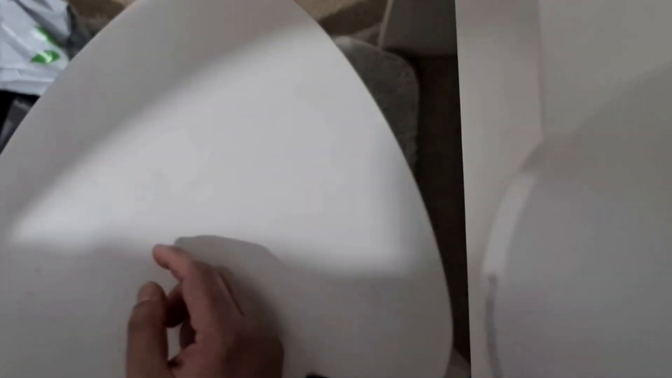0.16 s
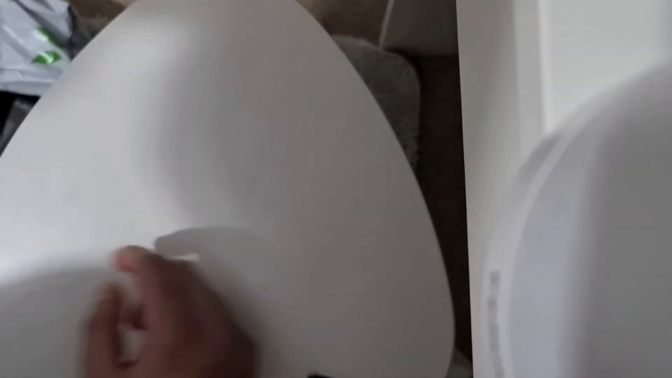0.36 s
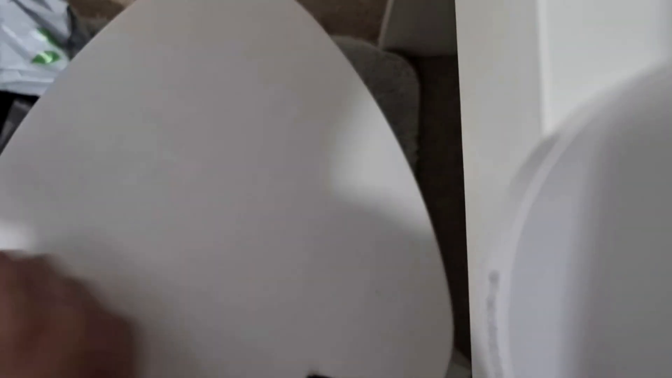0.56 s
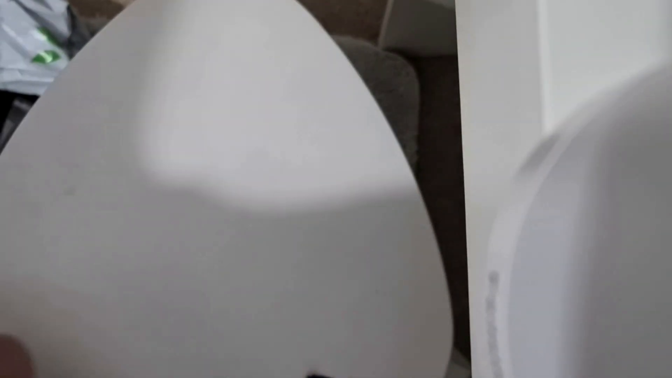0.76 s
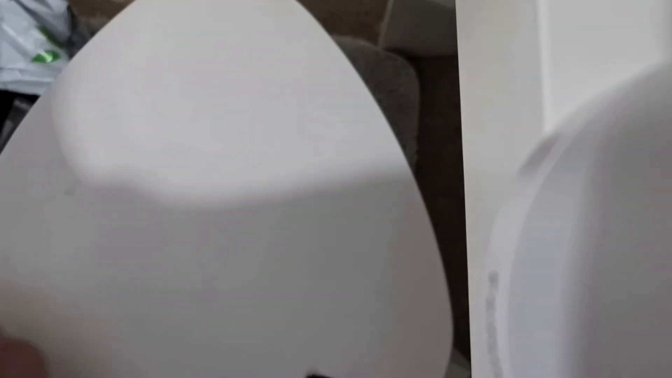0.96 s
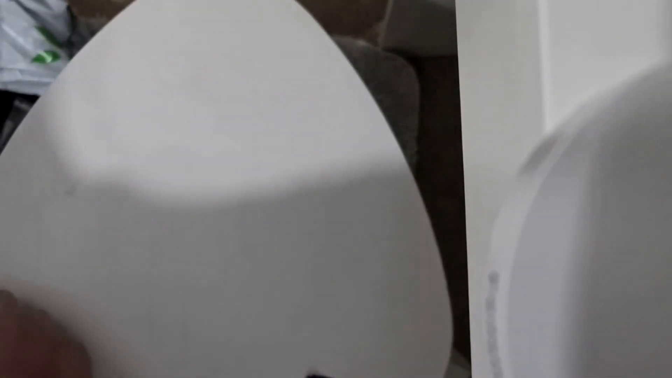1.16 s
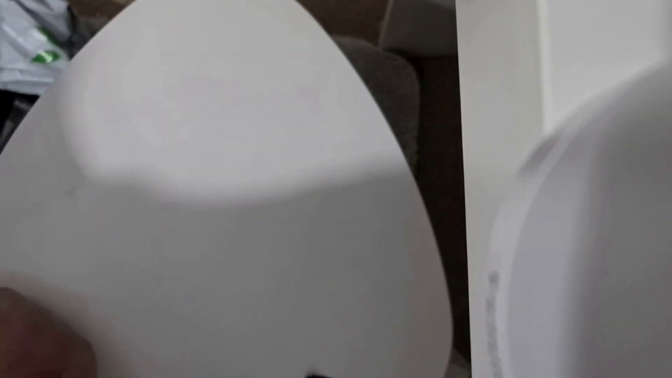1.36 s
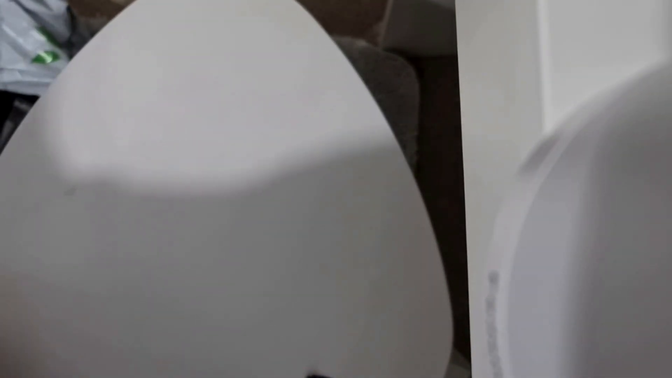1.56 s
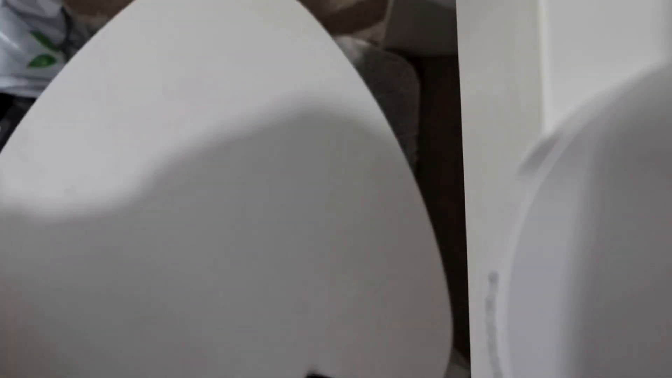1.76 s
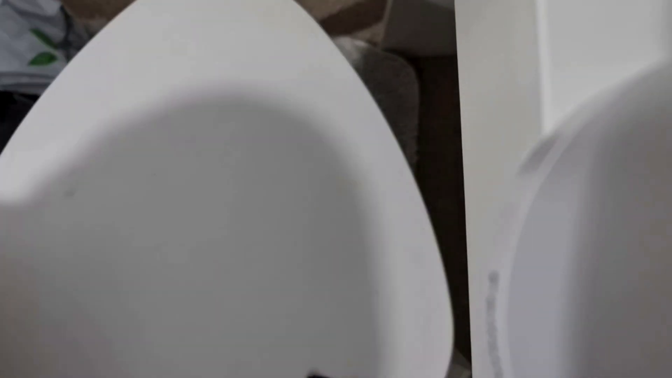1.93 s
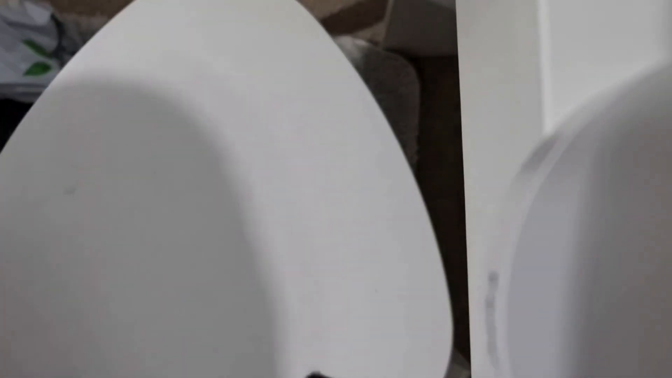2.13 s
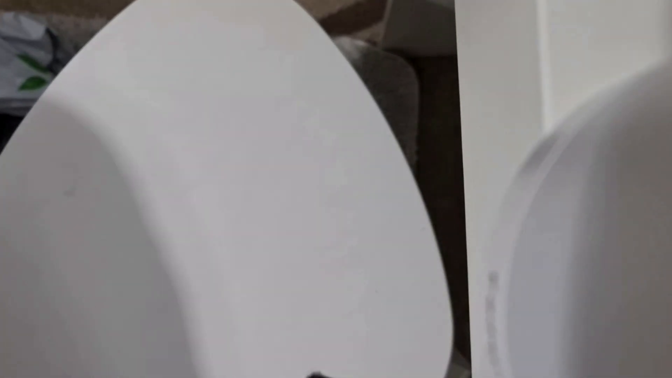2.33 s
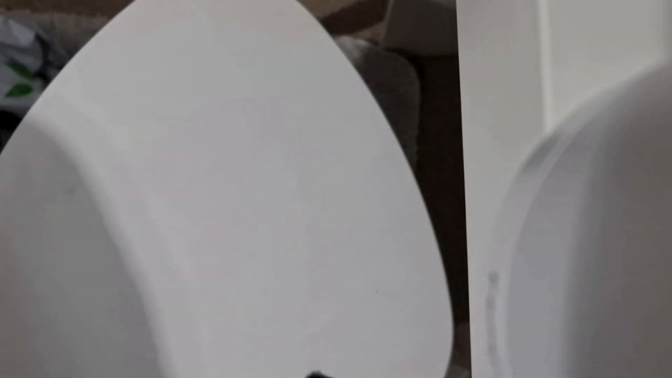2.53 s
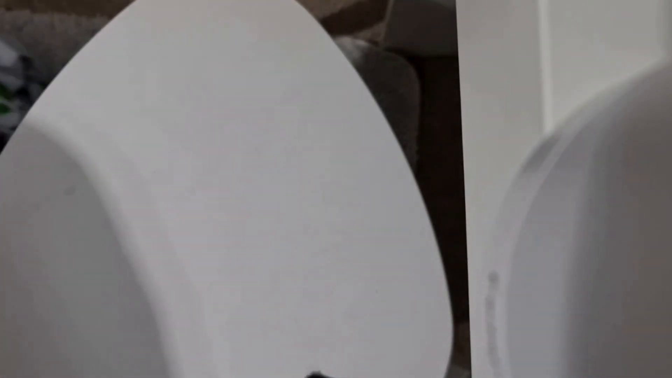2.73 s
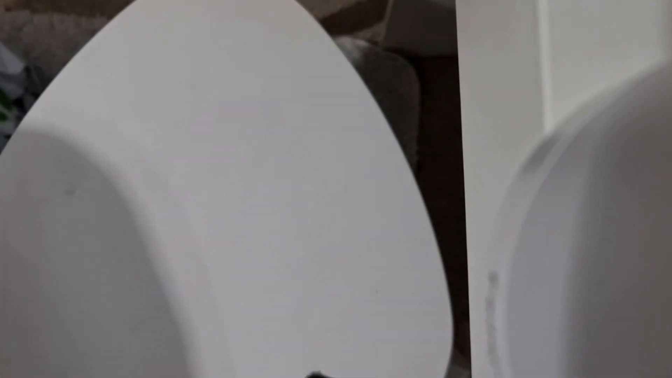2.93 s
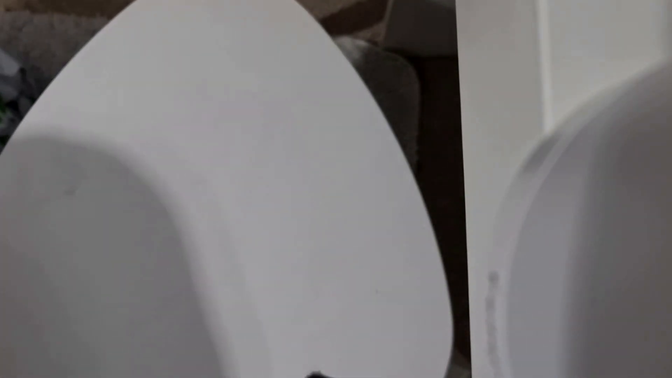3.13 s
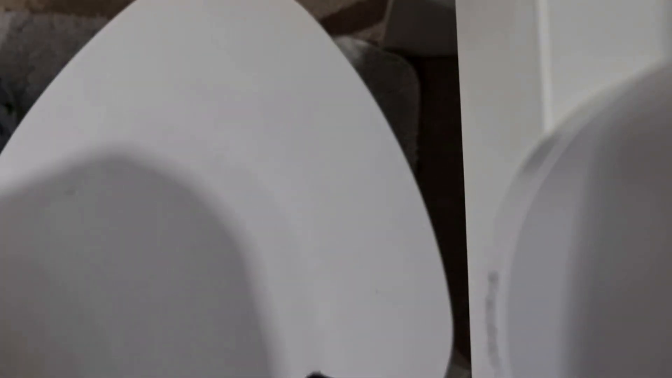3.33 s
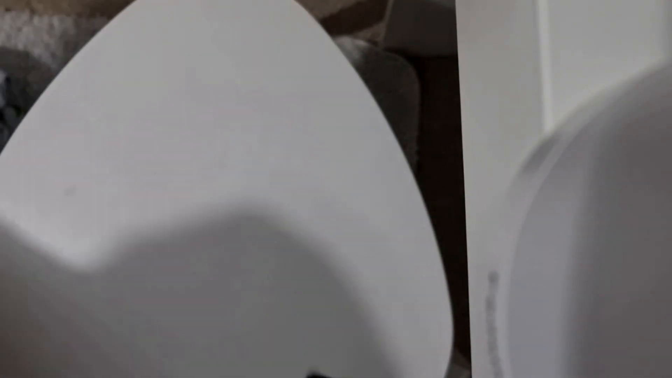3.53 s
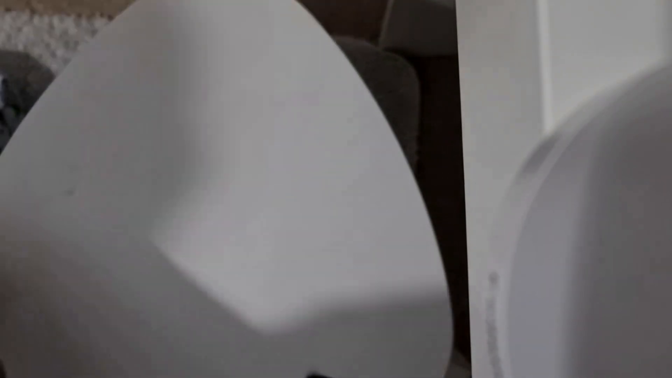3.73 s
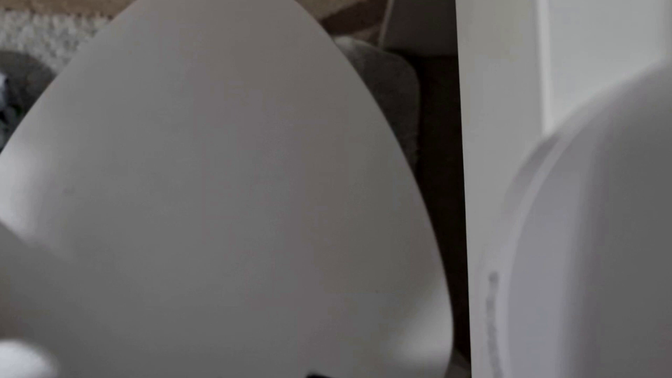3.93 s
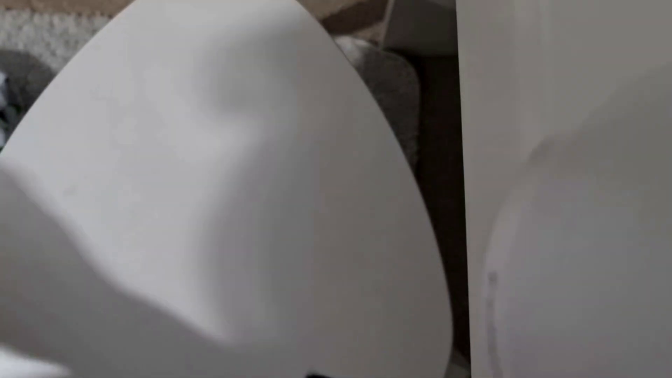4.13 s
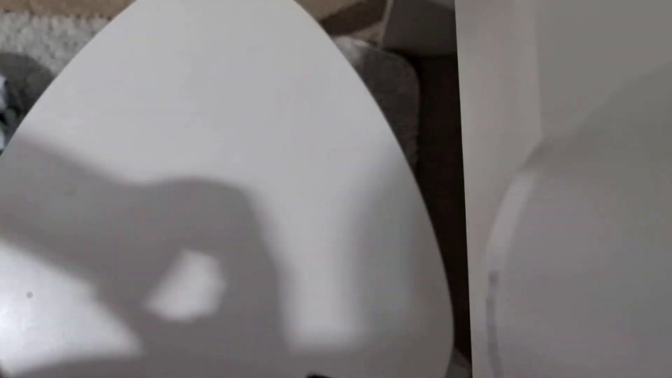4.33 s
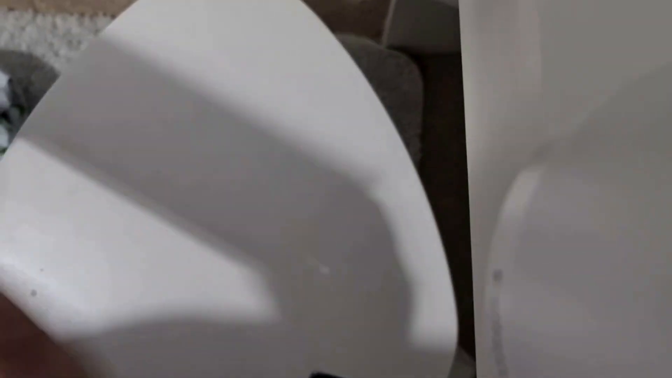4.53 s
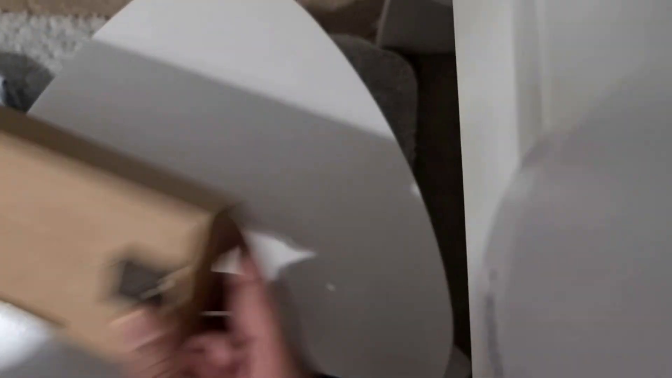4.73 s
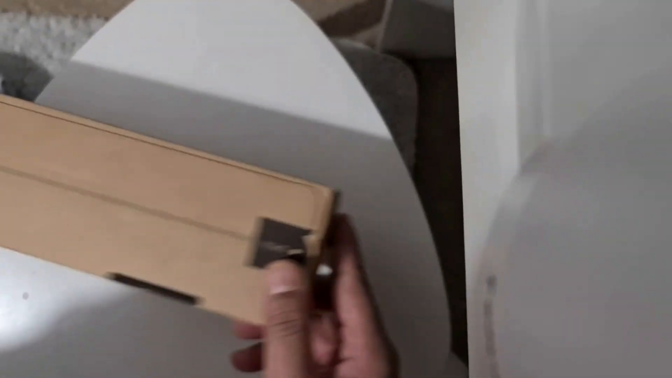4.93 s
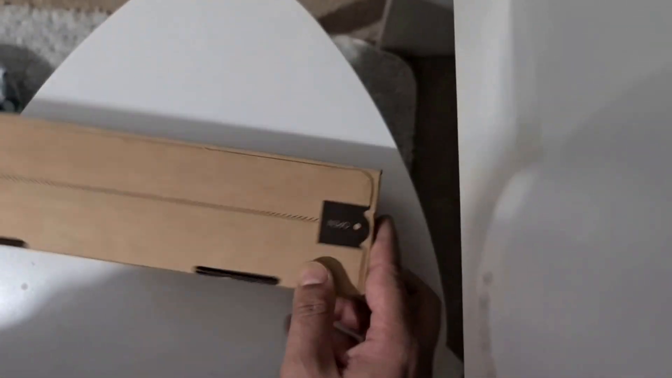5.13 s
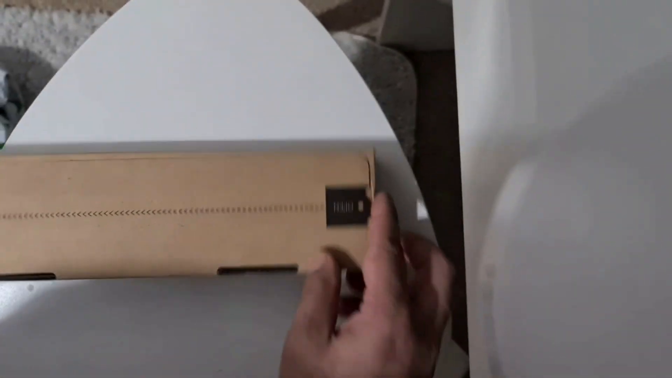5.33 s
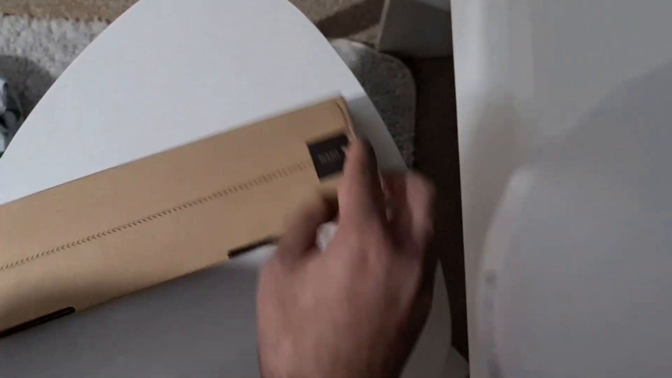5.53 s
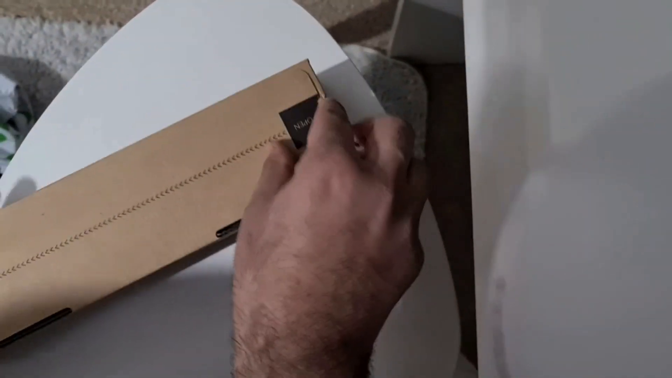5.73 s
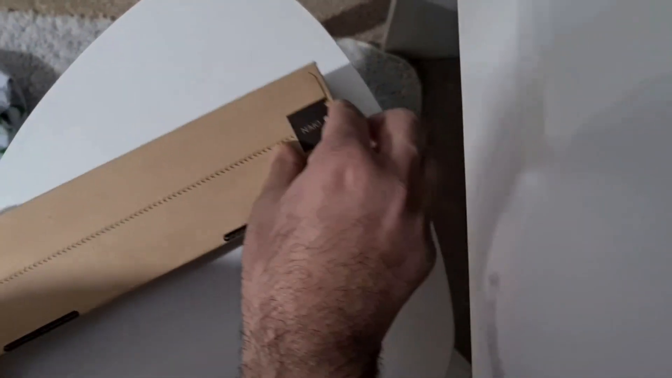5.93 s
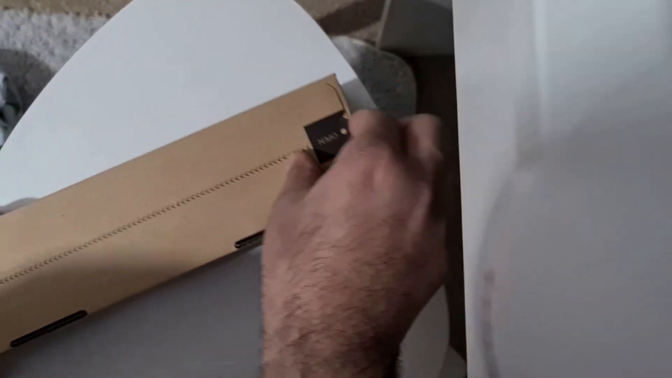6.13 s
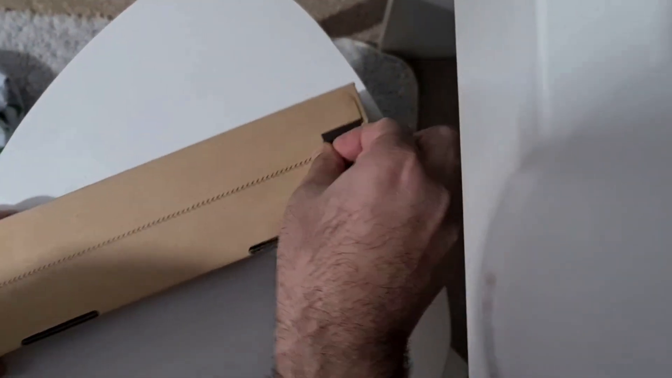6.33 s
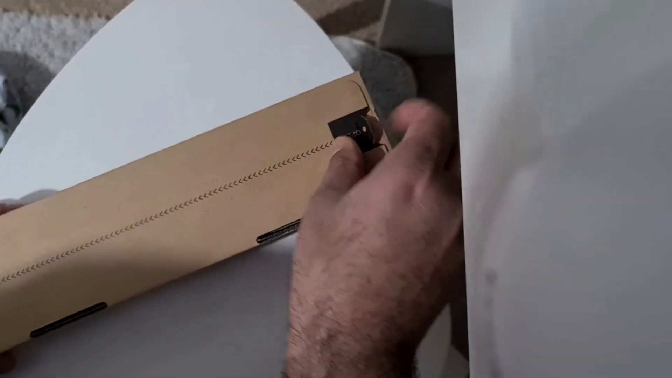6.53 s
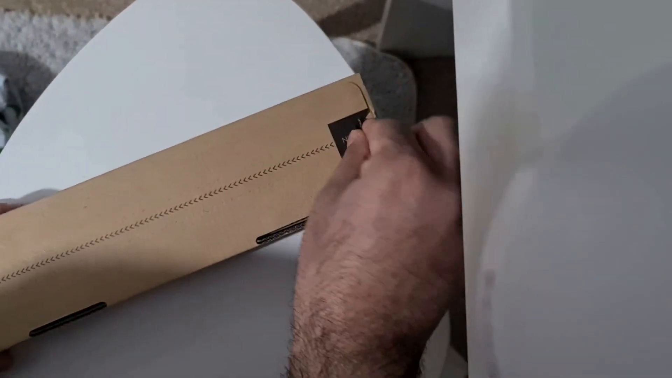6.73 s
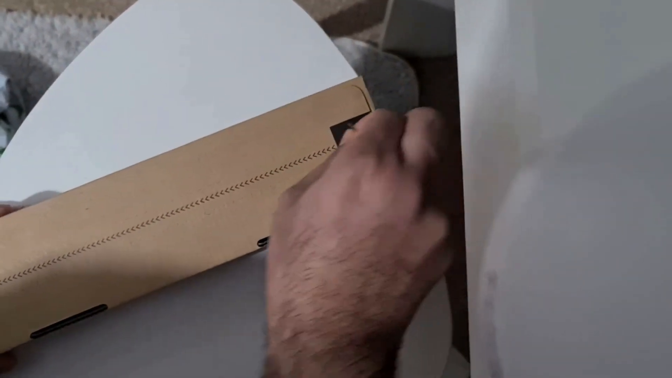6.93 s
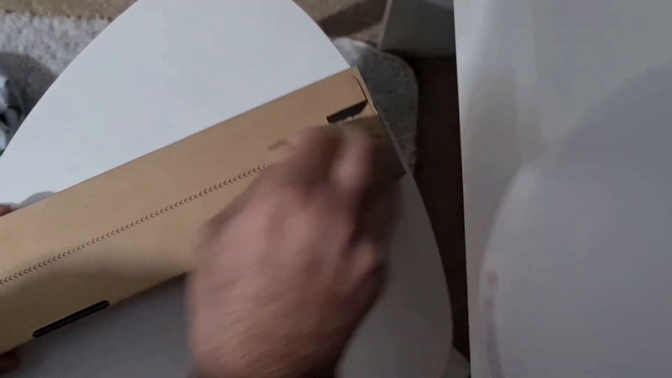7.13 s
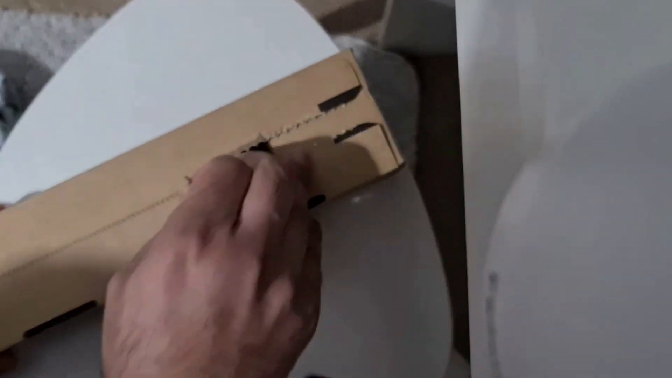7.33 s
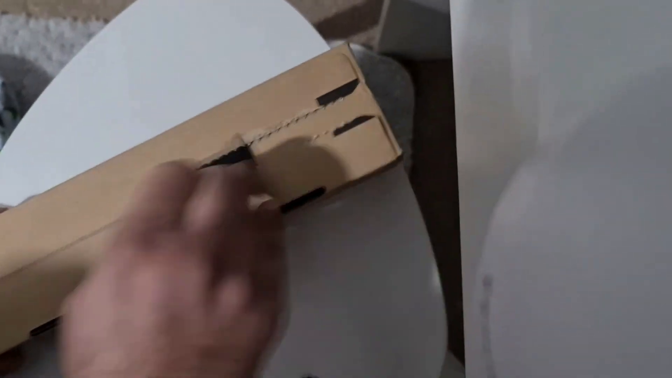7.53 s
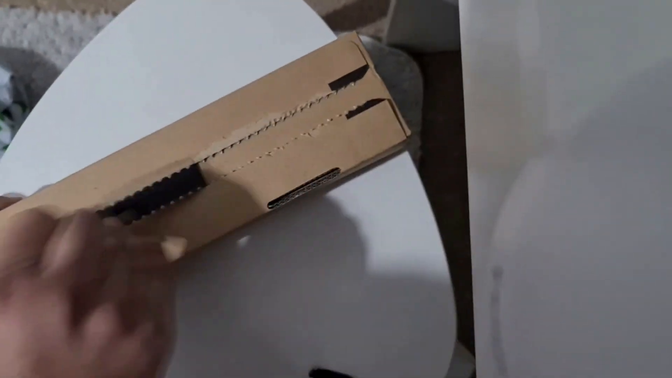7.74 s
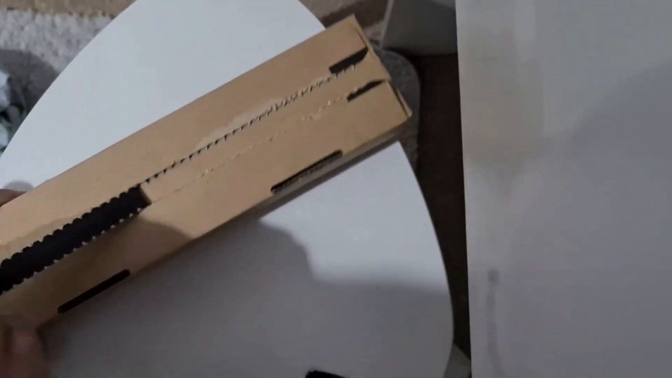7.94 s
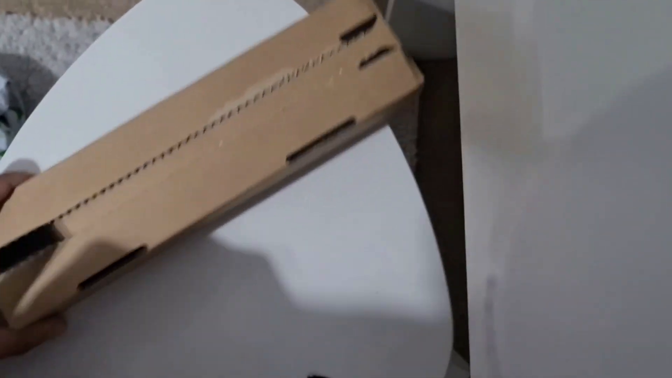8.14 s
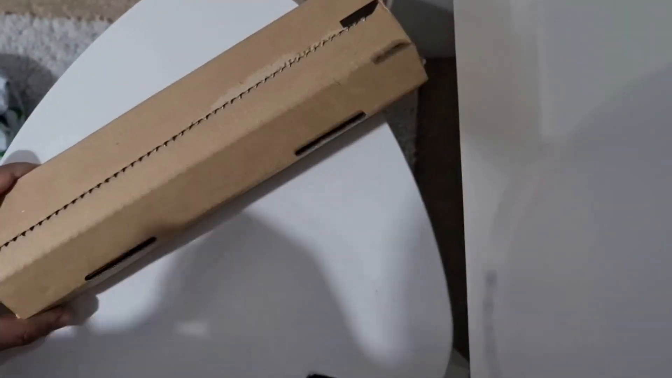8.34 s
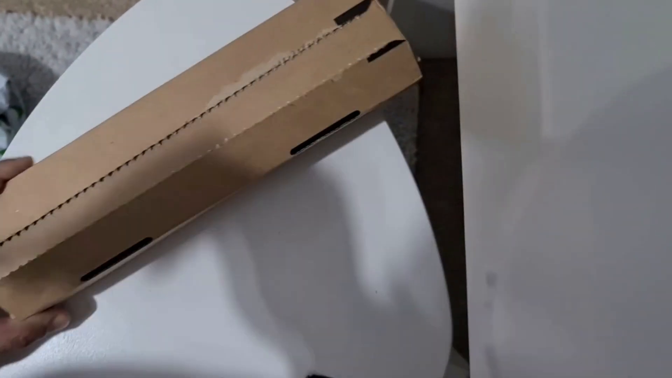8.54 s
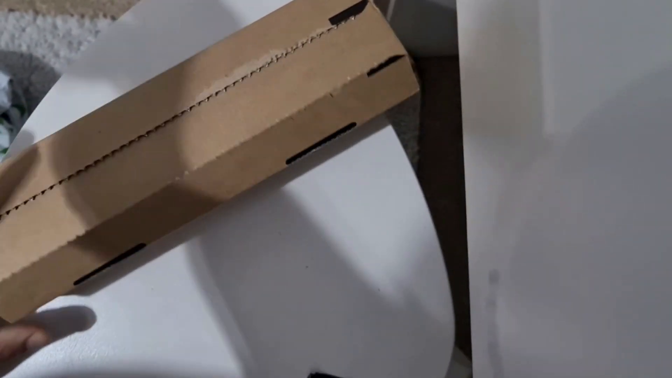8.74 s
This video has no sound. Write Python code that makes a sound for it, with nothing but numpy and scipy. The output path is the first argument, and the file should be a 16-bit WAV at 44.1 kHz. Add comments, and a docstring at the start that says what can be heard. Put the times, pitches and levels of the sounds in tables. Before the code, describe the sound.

A quiet, small room with faint air noise and a wavering deep rumble. Until 0.8 s there are only very soft taps; from 0.9 to 1.7 s come small clicks, light scuffs and a few dull cardboard knocks. From about 1.9 to 3.8 s board drags over board, a dry, uneven hiss with hollow rubbing and many little bumps, the strongest near 2.7 s. It falls nearly silent until knocks at 4.5 and 4.8 s, then a loud, boxy thump at 5.3 s with a short scuff. Light finger clicks follow around 6.3 to 6.7 s. At 7.0 to 7.4 s a perforated strip tears with a crackling, hollow rip. After a short gap, 7.6 to 8.5 s brings a longer, louder, brighter rip packed with snaps, fiercest after 8.2 s. Two tiny ticks and faint scuffs end it by 8.8 s. Close stereo microphone, sound leaning left.

```python
"""A faint low rumble and light knocks come first; cardboard boxes are slid, knocked and set on a small table.
Then a perforated strip is ripped off one in two pulls, each a dense crackle with sharp snaps.
Rubbing and tearing are stick-slip noise in hollow resonances; knocks are decaying modes, snaps noise bursts.
Two microphone ports hear the box from the left, over a quiet room of filtered noise and a faint hum."""
import sys
import numpy as np
from scipy import signal
from scipy.fft import rfft, irfft, next_fast_len
from scipy.io import wavfile
from scipy.ndimage import uniform_filter1d, map_coordinates

SR = 44100
rng = np.random.default_rng(int(sys.argv[2]) if len(sys.argv) > 2 else 0)


def digitize_waveform(pressure):
    """Quantize a signal to 16-bit integers and store it at the path in sys.argv[1].

    Rows of a 2-D input are taken as channels; values are limited to [-1, 1].
    """
    field = np.atleast_2d(pressure).T
    bounded = np.clip(field, -1, 1)
    quanta = np.round(bounded * 32767).astype(np.int16)
    wavfile.write(sys.argv[1], SR, quanta)


N = 387198

# Air and wall resonances of the box: f/Hz, nominal width/Hz, relative level/dB
HOLLOW_RESONANCES = [(341, 43, 0), (417.3, 158, 7.5), (585, 176, -0.5), (804, 110, -6), (170, 220, -2.5)]
# Panel resonances of the box: f/Hz, nominal width/Hz, relative level/dB
PANEL_RESONANCES = [(1090, 880, 4.5), (1310, 140, -15), (1600, 1130, 0.5), (2600, 1550, -1)]
# Shifting colours of the crackle: f/Hz, nominal width/Hz, relative level/dB
SHEEN_RESONANCES = [(1566, 430, -1), (2770, 1400, 3.5), (4130, 1500, -1.5), (5980, 970, -1)]
# One long drag of board over board: t/s, surface hiss level/dB, hollow body level/dB
DRAG_CURVE = [(1.8, -56, -69), (1.9, -45, -42), (1.96, -46.5, -53.5), (2.05, -38, -42.5),
              (2.12, -41.5, -44), (2.18, -49, -56.5), (2.36, -48, -50), (2.46, -55, -55.5),
              (2.55, -54, -51), (2.62, -39.5, -47), (2.72, -42.5, -41), (2.78, -44, -46),
              (2.88, -41, -41.5), (2.97, -43.5, -49.5), (3.06, -41.5, -45), (3.18, -47, -48),
              (3.23, -46, -55), (3.31, -43, -48), (3.38, -43, -50.5), (3.42, -40.5, -46),
              (3.54, -47.5, -55.5), (3.63, -46.5, -58), (3.78, -53.5, -47.5), (3.88, -74, -56.5),
              (4.2, -103, -57.5)]


def sliding():
    """Stick-slip friction: bumps excite the hollow's resonances, fine grit hisses and now and then ticks."""
    # Rubbing spectrum: f/Hz, relative spectral density/dB
    rub_spectrum = [(1290, -21), (2200, -5), (5420, -4), (10000, -12), (15000, -12.5), (16100, -40),
                    (16500, -43)]
    # Loose flap of the dragged board: f/Hz, nominal width/Hz, relative level/dB
    flap_resonances = [(782, 114, 0), (1390, 110, -6)]
    panel_db, hiss_weight = 0.5, 0.18  # panel level lies between those of hiss and body
    sheen_db, flap_db = -9, -3  # re hiss, re body

    hiss_gain, body_gain = contact()
    panel_gain = undb(panel_db) * hiss_gain ** hiss_weight * body_gain ** (1 - hiss_weight)
    body = resonate(grains(150, 2.2, 1.2, 40, 0.8), HOLLOW_RESONANCES)
    panels = resonate(grains(600, 2.5, 0.8, 30, 0.75), PANEL_RESONANCES)
    hiss = unit(colour(grains(4000, 3.5, 1.3, 50, 0.15), rub_spectrum))
    sheen = resonate(grains(2000, 3.5, 0.8, 40, 0.15), SHEEN_RESONANCES)
    flap = resonate(grains(150, 2.7, 1.25, 12, 0.91), flap_resonances)
    flap = flap * (np.arange(N) < DRAG_CURVE[-1][0] * SR)  # silent once the drag is over

    surface = hiss_gain * (hiss + undb(sheen_db) * sheen)
    hollow = body_gain * (body + undb(flap_db) * flap)
    return surface + hollow + panel_gain * panels


def contact():
    """Friction level follows the contact: gains of hiss and body for drag, scuffs and resting fingers."""
    # Short scuffs of hand or board: start t/s, length/s, surface hiss level/dB, hollow body level/dB
    scuffs = [(0.782, 0.11, -101, -55.5), (0.867, 0.1, -61, -54), (0.986, 0.13, -69, -51),
              (1.224, 0.14, -57, -60.5), (1.291, 0.3, -61, -93), (1.611, 0.061, -56, -43.5),
              (1.716, 0.05, -56.5, -69), (4.244, 0.19, -68, -97), (4.492, 0.056, -91, -56),
              (4.796, 0.13, -60.5, -59), (5.074, 0.12, -69, -64.5), (5.318, 0.045, -88, -32),
              (5.431, 0.37, -52, -51), (5.725, 0.31, -72.5, -60.5), (6.018, 0.24, -94, -57.5),
              (6.424, 0.058, -60, -45), (6.604, 0.033, -96, -57.5), (8.558, 0.17, -66, -69),
              (8.72, 0.082, -55, -47.5)]
    rise_share, fade_s = 0.25, 0.093  # share of the stroke spent rising; decay constant after it
    hold_start_s, hold_end_s = 0.63, 8.78
    hold_levels_db = [-79, -67.5]  # hiss, body

    t = np.arange(N) / SR
    gain = undb(read([DRAG_CURVE]))
    for start, length, hiss_db, body_db in scuffs:
        top, end = start + rise_share * length, start + length
        swell = np.sin(np.pi / 2 * np.interp(t, [start, top, end], [0, 1, 0.3])) ** 2
        fade = np.exp(-np.maximum(t - end, 0) / fade_s)
        gain = gain + np.outer(undb([hiss_db, body_db]), swell * fade)
    resting = (t > hold_start_s) * (t < hold_end_s) * undb(1.44 * walk(7.4))
    return gain + np.outer(undb(hold_levels_db), resting)


def tearing():
    """Fracture noise: fibres part in a dense crackle and excite the hollow box and its panels."""
    # The two pulls on the strip: t/s, tearing fibre level/dB, hollow body level/dB
    pulls = [
        [(6.98, -63, -69), (7.02, -40, -54), (7.08, -39.5, -44.5), (7.2, -36, -34.5), (7.4, -37, -38),
         (7.44, -69, -45.5), (7.49, -60.5, -47)],
        [(7.62, -36, -36), (7.645, -29.5, -30), (7.73, -31, -35.5), (7.85, -36.5, -34.5), (8.08, -34, -34.5),
         (8.15, -32, -27.5), (8.23, -23.5, -27.5), (8.3, -29, -36), (8.4, -25, -27.5), (8.46, -39, -30.5),
         (8.5, -54, -44.5), (8.55, -61.5, -62.5)],
    ]
    # Fibre spectrum: f/Hz, relative spectral density/dB
    fibre_spectrum = [(470, -7), (800, -8.5), (1130, -7.5), (1890, -9), (2840, -8), (3430, -9),
                      (6460, -13.5), (12200, -11), (15700, -15.5), (16500, -57)]
    sheen_db, panel_db = -8, -10  # re the fibres

    fibre_db, body_db = read(pulls)
    fibres = unit(colour(grains(3000, 3.0, 1.5, 90, 0.3), fibre_spectrum))
    body = resonate(grains(400, 1.8, 1.6, 70, 0.85), HOLLOW_RESONANCES)
    panels = resonate(grains(400, 2.5, 1.5, 50, 0.75), PANEL_RESONANCES[:2])
    sheen = resonate(grains(1200, 5.1, 0.76, 60, 0.5), SHEEN_RESONANCES)
    crackle = fibres + undb(sheen_db) * sheen + undb(panel_db) * panels
    return undb(fibre_db) * crackle + undb(body_db) * body


def snaps():
    """Sudden fracture: a bridge of fibres stretches, gives way in a few ms and frays; its jolt booms in the panels."""
    # Perforation bridges and label edges: t/s, peak level/dB, top-band and boom levels/dB re that peak
    snap_events = [(0.8912, -29.5, -9, -5.5), (1.065, -37, -37, 0), (1.275, -37, -21, -9),
                   (1.8033, -41, -15, -19), (2.901, -37, -10, -9), (3.175, -29, -3, -6),
                   (4.4585, -45.5, -23, -21), (4.82, -49, -20, 10.5), (6.2612, -29.5, -8, -3),
                   (6.3776, -37, 0, 2), (6.6643, -46, 2, -5), (7.0872, -26.5, -20, 6), (7.119, -21, -21, 3),
                   (7.163, -23, -23, 0), (7.215, -22, -15, -2), (7.2502, -19, 1, 1),
                   (7.2877, -20.5, -7, 0.5), (7.3286, -22, 0, -1), (7.6223, -20, 4, 4),
                   (7.657, -20, -1, -2), (7.6988, -19, 7, -11), (7.7185, -15.5, 2, -15),
                   (7.751, -16.5, -8, 2), (7.7797, -17, -11, 2.5), (7.8222, -10.5, -4, -5),
                   (7.86, -11.5, -4.5, -1.5), (7.9019, -12.5, -3, 1), (7.9398, -11.5, -5, -5.5),
                   (7.9988, -19, -8, 3.5), (8.0286, -11.5, -2, 0), (8.042, -15, 2, -6),
                   (8.085, -12.5, 0, -0.5), (8.1246, -12.5, 1.5, 3.5), (8.156, -13, -2, -13),
                   (8.1756, -11.5, -15, -1.5), (8.1978, -20, -12, 7), (8.278, -17, -8, 0.5),
                   (8.3264, -17, -12, -8), (8.3873, -12.5, 4, 2), (8.4049, -10, -2, -11.5),
                   (8.414, -18, -13, 7), (8.423, -26, -8, -0.5), (8.6278, -40, -8, -6),
                   (8.736, -38.5, -4, 3)]
    # Nominal boom pitch, highest in mid-tear and lower after it: t/s, f/Hz
    boom_pitch = [(0, 1350), (7.0, 1440), (7.87, 1493), (8.0, 1120), (8.78, 1100)]

    out, t = np.zeros((2, N)), np.arange(2048) / SR
    release = np.exp(-((t - 0.003) / 0.0025) ** 2)
    fraying = 0.1 * np.minimum(t / 0.0011, 1) * np.exp(-t / 0.035)
    shape = release + fraying
    for s, db, top_db, boom_db in snap_events:
        low = band(pair(len(t), 0.096) * shape, [1500, 6500])
        top = band(pair(len(t), 0.057) * shape, 7000, "high")
        centre = np.interp(s, *np.transpose(boom_pitch)) * undb(0.72 * rng.standard_normal())
        boom = band(pair(len(t), 0.64) * shape ** 1.76, np.array([0.82, 1.2]) * centre)
        add(out, s - 0.001, peak(low, db) + peak(top, db + top_db) + peak(boom, db + boom_db))
    return out


def knocks():
    """Impact excitation: blows ring the box's modes, with a short crack at full contact and some table thuds."""
    # Blows and jolts on the box: t/s, peak level/dB, crack level/dB re that peak
    blows = [(0.173, -46.5, -13), (0.212, -55, -5), (0.508, -42.5, -5), (1.01, -34, -6), (1.203, -25, -20),
             (1.46, -45, -5), (1.547, -41.5, -5), (1.62, -31, -11.5), (1.714, -35.5, -17), (1.895, -28, -7),
             (2.001, -31.5, -5), (2.106, -31, -12), (2.365, -28, -18), (2.395, -30.5, -7),
             (2.486, -36, -16), (2.69, -31, -11), (2.717, -20, -8), (2.736, -29, -10.5), (2.815, -38, -12),
             (2.885, -29, -9.5), (2.93, -31.5, -18), (3.044, -27.5, -10), (3.139, -30, -13),
             (3.264, -36, -8.5), (3.4, -33, -18), (3.439, -32, -20), (3.621, -31, -6), (4.502, -26, -17),
             (4.767, -22, -10.5), (5.125, -38, -9), (5.279, -33.5, 3.5), (5.3206, -7.5, -12.5),
             (5.421, -22.5, -14), (6.423, -24, -6), (6.769, -42.5, -16), (7.089, -19, -7),
             (7.157, -17.5, -8.5), (7.167, -25, -14), (7.214, -18.5, -8), (7.252, -14.5, -9.5),
             (7.312, -9.5, -9), (7.355, -13, -10), (7.399, -13, -15), (7.645, -19.5, -6), (7.677, -19, -3),
             (7.695, -19, -14), (7.72, -15.5, -4), (7.747, -11.5, -17), (7.795, -19.5, -22),
             (7.821, -21.5, -8.5), (7.842, -16, -33), (7.911, -19, -25), (7.961, -19, -5),
             (8.028, -13, -7.5), (8.083, -16.5, -22), (8.12, -19.5, -14), (8.157, -21, -10),
             (8.174, -14.5, -16), (8.255, -14.5, -18.5), (8.34, -20.5, -17), (8.365, -18, -12),
             (8.442, -23, -8), (8.456, -22, -9)]
    # Weight on the table top: t/s, peak level/dB
    thuds = [(1.201, -44.5), (1.625, -27.5), (1.649, -39.5), (4.765, -42.5), (5.321, -31), (7.644, -27.5),
             (7.744, -31), (8.179, -29)]
    # Modes of the box: f/Hz, relative level/dB, free decay time T60/s
    box_modes = [(352.7, -9.5, 0.13), (391, -3, 0.084), (417.5, -2.5, 0.11), (608, -13.5, 0.11),
                 (741, -14, 0.16), (805, 2, 0.024), (1097, -2, 0.063), (1300, 2, 0.07), (1616, 1.5, 0.04)]
    # Modes of the table: f/Hz, relative level/dB, decay time T60/s
    table_modes = [(122.3, -1, 0.19), (159.4, -6, 0.18), (206, -3, 0.19), (239, -3, 0.33)]
    ring_share, damp_per_db = 0.42, 0.17  # share of the free decay; a duller contact damps it more
    bright_hz, dull_per_db = 4600, 1.24  # the ring's upper edge falls as the contact softens
    box_push_s, table_push_s = 0.0034, 0.0047

    out, t = np.zeros((2, N)), np.arange(2048) / SR
    burst = np.minimum(t / 0.00095, 1) * (np.exp(-t / 0.0013) + 0.19 * np.exp(-t / 0.018))
    for s, db, crack_db in blows:
        share = np.clip(ring_share * undb(damp_per_db * crack_db), 0.05, 2)
        top_hz = np.clip(bright_hz * undb(dull_per_db * crack_db), 650, 9000)
        body = band(ring(box_modes, share, box_push_s), [260, top_hz])
        add(out, s, peak(body, db))
        crack = band(pair(len(t), 0.21) * burst, [900, 3000])
        add(out, s + 0.0035, peak(crack, db + crack_db))
    for s, db in thuds:
        add(out, s, peak(ring(table_modes, 1, table_push_s), db))
    return out


def ring(modes, share, push_s):
    """Modal decay: damped sines grow while the push lasts; random mode weights stand for where it lands."""
    t = np.arange(SR // 3) / SR
    sound = 0
    for hz, db, t60 in modes:
        weight, detune, turn = rng.standard_normal(3)
        wave = np.sin(2 * np.pi * hz * (1 + 0.054 * detune) * t + 0.99 * turn)
        decay = np.exp(-np.log(1000) * t / (t60 * share))
        sound = sound + undb(db + 1.6 * weight) * wave * decay
    return sound * np.sin(np.pi / 2 * np.minimum(t / push_s, 1)) ** 2


def ports(x):
    """Interaural-style cues: the left port leads, shadowing tilts the spectra, each port has its own echoes."""
    # Place of the box: t/s, lead of the left port/samples, share of the shadow (1 = full)
    lead = [(0, 28.2, 0.6), (3, 18.2, 0.31), (4.6, 22, 0.58), (4.999, 11.9, 1.33), (8.78, 15, 0.9)]
    # Full acoustic shadow: f/Hz, left minus right level/dB
    shadow = [(20, 12), (250, -1), (1000, 7.5), (4000, 4.5), (12000, 2.5), (22050, -7)]
    room_t60_s, room_db, room_band_hz = 0.16, -9, [500, 6260]

    i = np.arange(N)
    s, lag, share = np.transpose(lead)
    lag, share = np.interp(i / SR, s, lag), np.interp(i / SR, s, share)
    left = map_coordinates(x[0], [i + lag / 2], order=3)
    right = map_coordinates(x[1], [i - lag / 2], order=3)

    # echoes of table and walls: decaying noise, starting after 2 ms
    t = np.arange(SR // 2) / SR
    echo = rng.standard_normal((2, len(t))) * np.exp(-np.log(1000) * t / room_t60_s) * (t > 0.002)
    echo = band(echo, room_band_hz, order=1)
    echo = echo / np.sqrt(np.sum(echo ** 2, axis=1, keepdims=True))
    both = np.array([left, right]) + undb(room_db) * signal.fftconvolve(x, echo, axes=1)[:, :N]

    # half of the level difference goes to each port, with opposite sign
    shaded = np.array([colour(c, np.array(shadow) * [1, sign / 2]) for c, sign in zip(both, (1, -1))])
    return (both + share * (shaded - both)) * undb(-1.5)


def background():
    """Room noise: partly decorrelated air and deep noise, with a hum and a rumble that wavers and swells."""
    # Room air spectrum: f/Hz, relative spectral density/dB
    air_spectrum = [(53, -11), (90, -3.5), (136, -16.5), (211, -12.5), (292, -19), (371, -22.5),
                    (2760, -31), (5550, -37), (7860, -53), (14800, -41), (16500, -51)]
    # Wavering rumble: t/s, centre f/Hz, level/dB
    rumble_curve = [(0, 54.5, -55), (.7, 50.3, -46.5), (1.05, 49, -54), (3.3, 54.34, -53), (5.3, 52, -50.5),
                    (5.8, 52.8, -55), (6.6, 66.7, -46.5), (7.1, 64.7, -46), (7.46, 48.53, -40),
                    (8.78, 57.47, -50.5)]
    # Deep noise: f/Hz, relative spectral density/dB
    deep_spectrum = [(12, -37), (22, 9.0), (45, -6.5), (75, -1.0), (110, -12)]
    air_db, deep_db = -63.5, -8.5  # air: mean level; deep: re the rumble
    hum_hz, hum_db = 232, -70  # mean pitch and level

    t = np.arange(N) / SR
    s, hz, db = np.transpose(rumble_curve)
    # narrow-band noise: slow random sway on a carrier at the moving centre
    turn = 2 * np.pi * np.cumsum(np.interp(t, s, hz)) / SR
    rumble = unit(walk(26) * np.cos(turn) + walk(26) * np.sin(turn))
    deep = unit(colour(pair(N, 0.84), deep_spectrum)) * undb(deep_db)
    hum = undb(hum_db + 2.5 * walk(9)) * np.sin(2 * np.pi * hum_hz * t + 1.5 * walk(12))
    air = unit(colour(pair(N, 0.18), air_spectrum)) * undb(air_db + 0.5 * walk(15.0))
    return air + hum + (rumble + deep) * undb(np.interp(t, s, db))


def grains(per_s, spread_db, patchy_db, patch_rate, alike):
    """Stick-slip noise: every grain has its own size, and the grip comes in patches."""
    k = int(SR / per_s)
    size = np.minimum(rng.exponential(size=N // k + 1), 5)
    size = np.repeat(size, k)[:N]
    return unit(pair(N, alike) * undb(spread_db * size + patchy_db * walk(patch_rate)))


def resonate(x, peaks):
    """Parallel resonance: each filter acts twice for dark valleys; the moving contact favours them in turn."""
    out = 0
    for hz, width, db in peaks:
        b, a = signal.iirpeak(hz, hz / width / 1.07, SR)
        favour = undb(1.5 * walk(24))
        mode = signal.lfilter(b, a, signal.lfilter(b, a, x))
        out = out + undb(db) * favour * unit(mode)
    return unit(out)


def colour(x, points):
    """Spectral shaping: gain interpolated in dB over log frequency, cut beyond the outer points."""
    hz, db = np.transpose(points)
    size = next_fast_len(x.shape[-1])
    log_f = np.log(np.arange(size // 2 + 1) * SR / size + 1)
    gain = undb(np.interp(log_f, np.log(hz), db, -120, -120))
    return irfft(rfft(x, size) * gain, size)[..., :x.shape[-1]]


def band(x, edges_hz, kind="band", order=2):
    """Butterworth filtering: a maximally flat pass band."""
    return signal.sosfilt(signal.butter(order, edges_hz, kind, fs=SR, output="sos"), x)


def pair(size, alike):
    """Partial coherence: noise from a wide source reaches the two ports only partly alike."""
    noise, alike = rng.standard_normal((3, size)), np.clip(alike, 0, 1)
    return np.sqrt(alike) * noise[0] + np.sqrt(1 - alike) * noise[1:]


def walk(rate):
    """Slow random modulation: levels held 1 / rate s, then slewed by a moving average; spread near 1.5."""
    k = int(SR / rate)
    held = np.repeat(rng.standard_normal(N // k + 1), k)
    return 1.84 * uniform_filter1d(held, k)[:N]


def read(tables):
    """Envelope interpolation: level columns at every sample, linear in dB and silent between spans."""
    rows = []
    for table in tables:
        off = [-120] * (len(table[0]) - 1)
        rows += [(table[0][0] - 0.03, *off), *table, (table[-1][0] + 0.09, *off)]
    s, *columns = np.transpose(rows)
    return [np.interp(np.arange(N) / SR, s, c) for c in columns]


def add(out, s, sound):
    """Superposition: sum a sound into the ports from time s."""
    i = int(s * SR)
    out[:, i:i + sound.shape[-1]] += sound[..., :N - i]


def undb(db):
    """Level to amplitude: 20 dB is a factor of ten."""
    return 10 ** (np.asarray(db) / 20)


def unit(x):
    """Normalisation to an effective (RMS) value of 1."""
    return x / np.sqrt(np.mean(x ** 2))


def peak(x, db):
    """Normalisation to a peak level in dB."""
    return x * undb(db) / np.max(np.abs(x))


def scene():
    """Superposition: the box sounds pass to the ports, and the room is added."""
    return ports(sliding() + tearing() + snaps() + knocks()) + background()


def record(dry):
    """Band limitation: the recorder cuts the top with a steep elliptic low-pass."""
    top_hz = 16100
    return signal.sosfilt(signal.ellip(10, 0.2, 80, top_hz, fs=SR, output="sos"), dry)


dry = scene()
out = record(dry)
digitize_waveform(out)
```